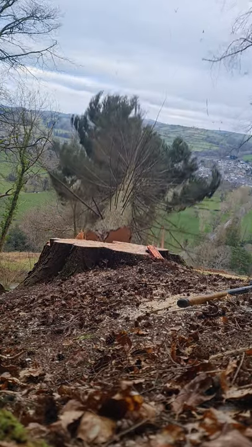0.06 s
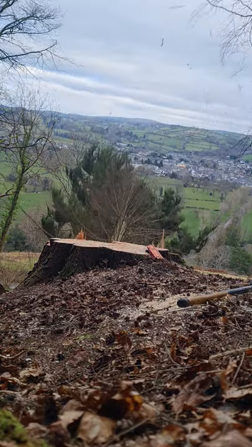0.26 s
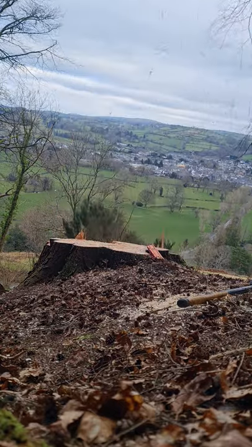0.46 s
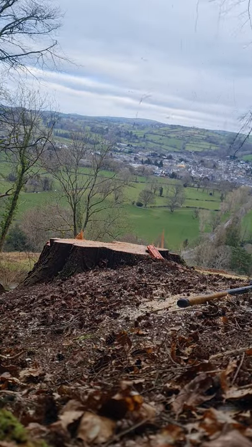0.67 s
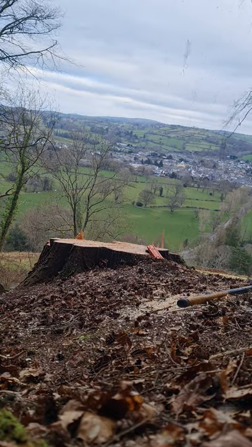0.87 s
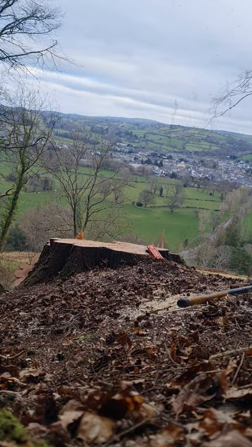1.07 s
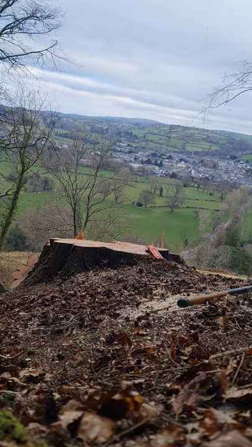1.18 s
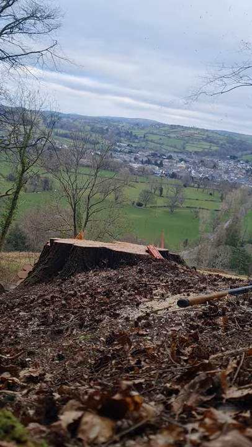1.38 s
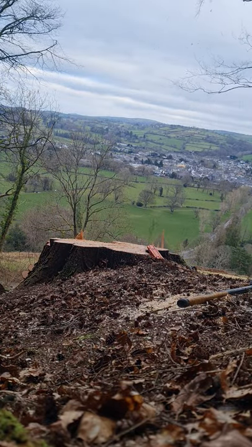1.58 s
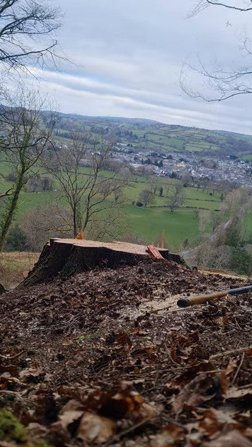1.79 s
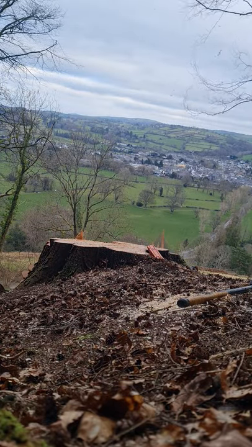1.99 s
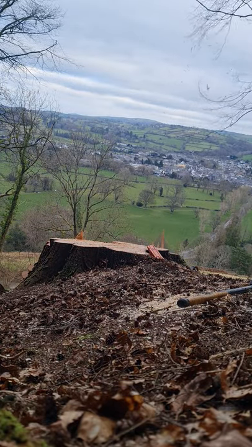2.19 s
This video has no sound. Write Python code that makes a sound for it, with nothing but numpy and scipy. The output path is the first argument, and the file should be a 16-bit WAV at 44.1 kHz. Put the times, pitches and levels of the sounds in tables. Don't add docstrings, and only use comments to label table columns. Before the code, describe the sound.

A large felled tree crashes through snapping branches and lands with a heavy, deep thud outdoors

```python
import sys
import numpy as np
from scipy import signal
from scipy.fft import rfft, irfft, next_fast_len
from scipy.io import wavfile
from scipy.ndimage import map_coordinates

SR = 44100
rng = np.random.default_rng(int(sys.argv[2]) if len(sys.argv) > 2 else 0)


def int16_out(signal):
    q = np.round(np.clip(np.atleast_2d(signal).T, -1, 1) * 32767)
    wavfile.write(sys.argv[1], SR, q.astype(np.int16))


def gain_from_db(level_db):
    decades = np.asarray(level_db, float) / 20
    return 10 ** decades


N = 99225

THUD_S = .7447


def unit(x):
    return x / np.sqrt(np.mean(x ** 2) + 1e-20)


def along(points, hz):
    f, v = np.transpose(points)
    return np.interp(np.log(hz + 1), np.log(f + 1), v)


def curves(rows):
    s, *cols = np.transpose(rows)
    return [np.interp(np.arange(N) / SR, s, c) for c in cols]


def wobble(rate):
    knots = rng.standard_normal(int(N * rate / SR) + 4)
    return map_coordinates(knots, [np.arange(N) * rate / SR])


def filtered(x, response):
    m = next_fast_len(N + 8192)
    return irfft(rfft(x, m) * response(np.fft.rfftfreq(m, 1 / SR)), m)[..., :N]


def coloured(noise, spectrum):
    return unit(filtered(noise, lambda hz: gain_from_db(along(spectrum, hz))))


def spread(pair):
    # frequency in Hz, left-right likeness from 0 to 1.
    likeness = [(60, 0.9), (180, 1), (550, 0.88), (1650, 0.028), (4970, 0.17), (15000, 0.72)]

    def mid_side_gains(hz):
        angle = np.arccos(np.clip(along(likeness, hz), -1, 1)) / 2
        return np.array([np.cos(angle), np.sin(angle)])
    mid, side = filtered(pair, mid_side_gains)
    return np.array([mid + side, mid - side])


def valley():
    # frequency in Hz, level of the distant hush in dB per Hz.
    hush_spectrum = [(20, -26), (40, -3), (65, 4.5), (150, -6), (300, -11.5), (1300, -15.5), (4500, -21.5),
                     (15000, -27)]
    whine_hz, whine_db, on_s, off_s = 1240, -65.5, 1.58, 2.09
    t = np.arange(N) / SR
    hush = coloured(rng.standard_normal((2, N)), hush_spectrum) * gain_from_db(-54 + .5 * wobble(5.77))
    gate = np.clip(np.minimum(t - on_s, off_s - t) / 0.021, 0, 1)
    whine_level = np.sqrt(2) * gain_from_db(whine_db + .6 * wobble(29.0))
    whine = whine_level * gate * np.sin(2 * np.pi * whine_hz * t)
    return spread(hush) + whine


def snaps():
    # start in seconds, peak in dB, pitch in Hz.
    far_twigs = [(.0125, -20.5, 4200), (.0925, -32.5, 4100), (.1785, -27, 3210), (.191, -19.5, 4170),
                 (.1967, -20, 2950), (.227, -9, 3400), (.253, -11, 4050), (.286, -16, 3470),
                 (.2945, -21, 2200), (.3015, -17, 3010), (.377, -27, 1820), (.39, -18.5, 1850),
                 (.426, -20.5, 1780), (.469, -22, 1810), (.479, -16.5, 3500), (.49, -16, 3500),
                 (.4937, -24.5, 1840), (.535, -16, 3460), (.557, -18, 2150), (.5755, -13.5, 3070),
                 (.594, -21, 1800), (.624, -17, 2800), (.6643, -12, 3630), (.6754, -12, 3000),
                 (.689, -11, 3200), (.704, -14, 3200), (.7283, -14.5, 2440), (.7846, -20, 1680),
                 (.797, -15, 900), (.803, -15.5, 1890), (.8045, -13.5, 760), (.8276, -16.5, 1290),
                 (.866, -15, 800), (.874, -15, 660), (.8959, -19, 1710), (.9075, -18, 1700),
                 (.9414, -16, 1480), (.9543, -20, 1700), (1.0285, -32, 3520), (1.0957, -29, 1710),
                 (1.1215, -29, 1700), (1.1435, -23, 3540), (1.1867, -19, 2970), (1.2095, -23, 2510),
                 (1.237, -28.5, 2800), (1.2848, -20, 2200), (1.3285, -24, 2900), (1.372, -26.5, 1310),
                 (1.3893, -29, 2000), (1.4313, -31, 1400), (1.4425, -29, 1870), (1.5077, -38, 1500)]
    # start in seconds, peak in dB, pitch in Hz.
    near_twigs = [(.0128, -19, 12500), (.0128, -24, 7500), (.026, -28, 700), (.0343, -18, 13000),
                  (.036, -23, 7500), (.0882, -20, 13000), (.2276, -18, 2200), (.2273, -17, 5500),
                  (.2275, -20, 12500), (.2532, -11, 4300), (.5752, -9, 1700), (.5761, -11, 4300),
                  (.7287, -11, 4800), (.7293, -23, 9000), (1.0218, -30, 8000), (1.143, -32, 6500),
                  (1.187, -29, 7500), (1.2088, -30, 7500), (1.2851, -25, 3800), (1.3153, -14, 7000),
                  (1.3153, -9.5, 13500), (1.3168, -19, 12000), (1.317, -24, 3700), (1.3187, -26, 3700),
                  (1.3186, -14, 12500), (1.491, -28, 3600), (1.4916, -39, 7500), (1.9137, -36, 1250),
                  (1.9133, -37, 4000), (2.189, -45, 1400), (2.195, -43, 1400)]
    ring_cycles, splinter_cycles = 2.8, 35
    splinter_db, late_s = -8, .0007
    shower_db, shower_t60_s = -28.5, 0.16
    out, t = np.zeros((2, N + 4096)), np.arange(2048) / SR
    for k, (s, db, hz) in enumerate([*far_twigs, *near_twigs]):
        rise = 1 - np.exp(-t * hz)
        phase = np.pi * rng.random() * min(hz / 2000, 1) * np.array([[0], [1]])
        ring = rise * np.sin(2 * np.pi * hz * t + phase) * gain_from_db(-20 * t * hz / ring_cycles)
        band = signal.butter(2, [hz / 1.405, min(hz * 1.44, SR / 2 - 999)], "band", fs=SR)
        splinters = unit(signal.lfilter(*band, rng.standard_normal((2, len(t)))))
        burst = gain_from_db(splinter_db - 60 * t * hz / splinter_cycles)
        shower = (k < len(far_twigs)) * gain_from_db(shower_db - 60 * t / shower_t60_s)
        at = round((s + late_s) * SR)
        out[:, at:at + len(t)] += gain_from_db(db + 2.5) * (ring + rise * splinters * (burst + shower))
    return out[:, :N]


def ground():
    # time in seconds, shaking of the ground in dB.
    shaking = [(0, -46), (.044, -41), (.15, -42.5), (.244, -29), (.298, -32), (.432, -26), (.57, -31),
               (.7, -25), (.77, -16.5), (.86, -17.5), (.94, -27), (1.212, -44.5), (1.386, -43.5),
               (1.568, -63), (1.6, -56)]
    # frequency in Hz, level of the rumble in dB per Hz.
    rumble_spectrum = [(12, -39), (20, -17), (60, -1.5), (108, -3.5), (192, -15.5), (245, -9.5),
                       (500, -22.5), (650, -69), (1100, -120)]
    shake_db, = curves(shaking)
    fade = np.clip((1.7 - np.arange(N) / SR) / 0.15, 0, 1)
    rumble = coloured(rng.standard_normal((2, N)), rumble_spectrum)
    return gain_from_db(shake_db - 2.5 + 3.0 * wobble(14.26)) * fade * rumble


def crackle(spectrum, grain_db, spread_db, life_s, count):
    when, luck = rng.random((count, 2)).T
    sizes = gain_from_db(-spread_db * np.log(1 - .98 * luck))
    breaks = np.bincount((when * N).astype(int), sizes, N)
    spiky = unit(signal.lfilter([1], [1, -np.exp(-1 / (life_s * SR))], breaks))
    noise = rng.standard_normal((2, N)) * (1 + gain_from_db(grain_db) * spiky)
    return coloured(noise, spectrum)


def branches():
    # time in seconds, force of the breaking in dB, share hidden by the slope from 0 to 1.
    crash = [(0, -42, 0.09), (.04, -39, 0), (.16, -43, 0.18), (.221, -37.5, 0.18), (.228, -32.5, 0.05),
             (.36, -35.5, 0.24), (.62, -34, 0.3), (.735, -30.5, 0.49), (.76, -31, 0.78), (.89, -30.5, 0.94),
             (.99, -35.5, 0.88), (1.12, -44.5, 0.91), (1.2, -45, 0.28), (1.3, -45, 0.6), (1.4, -48, 0.87),
             (1.52, -54.5, 0.72), (1.66, -61.5, 0.63), (2.25, -66, 1)]
    # frequency in Hz, level in dB per Hz.
    open_spectrum = [(120, -42), (250, -12), (500, -1.5), (900, -8), (2000, -9), (3500, -4), (6000, -10.5),
                     (15000, -14)]
    # frequency in Hz, level in dB per Hz.
    hidden_spectrum = [(120, -32), (250, -2.5), (500, -2), (900, -1.5), (2400, -1.5), (4000, -8.5),
                       (7000, -21), (15000, -51)]
    force_db, hidden = curves(crash)
    hidden = np.clip(hidden, 0, 1)
    seen = crackle(open_spectrum, grain_db=-13.0, spread_db=-4.0, life_s=0.0037, count=500)
    seen = seen * gain_from_db(0.69 * wobble(23.95))
    behind = crackle(hidden_spectrum, grain_db=-11.5, spread_db=8.5, life_s=0.0057, count=500)
    behind = behind * gain_from_db(0.67 * wobble(18) + 1.0)
    clumping = np.clip((np.arange(N) / SR - 1.15) * 10, 0, 1)
    force_db = force_db + 1.2 * clumping * (wobble(29.84) - .5)
    return gain_from_db(force_db + 5.5) * (np.sqrt(1 - hidden) * seen + np.sqrt(hidden) * behind)


def wood(x):
    t = np.arange(SR // 4) / SR
    decay = gain_from_db(-60 * t / .13)
    tail = rng.standard_normal((2, len(t))) * decay * (1 - np.exp(-t / 0.0044))
    tail = tail / np.linalg.norm(tail[0])
    return spread(signal.fftconvolve(x[None], tail, axes=1)[:, :N])


def push(s, db, hz, cycles):
    u = (np.arange(N) / SR - s) * hz
    return gain_from_db(db) * np.cos(2 * np.pi * u) * np.exp(-(u / cycles) ** 2)


def trunk():
    # time in seconds, peak in dB, pitch in Hz, signed strength.
    ground_bumps = [(0.049, -25.5, 302, 0.86), (.225, -18, 250, -0.81), (0.238, -22.5, 120, 1),
                    (0.2528, -22.5, 100, 0.92), (.259, -20.5, 89, 0.92), (0.267, -24, 60, -0.92),
                    (0.3304, -14.5, 283, -0.94), (.335, -21, 260, -1), (0.344, -16, 128, 0.67),
                    (.411, -14, 109, 1), (0.4185, -15, 151, -0.95), (0.4266, -7, 210, 0.66),
                    (0.4395, -20, 67, -1.1), (0.4493, -23, 70, 1), (.497, -24, 114, -0.78),
                    (0.6704, -18, 200, -1.03), (.68, -19.5, 70, 0.93), (0.7, -23, 160, 1),
                    (0.7094, -24, 121, -1.5), (0.7258, -15.5, 80.4, 0.57), (0.762, -9, 120, 1),
                    (0.7726, -11.5, 170, 0.91), (0.7797, -18, 200, 1), (0.7913, -6, 109, 0.97),
                    (.802, -11, 350, 1), (0.8057, -10.5, 332, -1), (0.8218, -22, 200, -0.75),
                    (0.8262, -12.5, 250, -1), (0.8307, -16, 109, 1), (0.8364, -16.5, 90, -1),
                    (0.8431, -17.5, 109, 0.93), (0.8487, -15.5, 130, -0.92), (0.8675, -28, 70, -1.9),
                    (0.877, -20, 60, 1), (0.8882, -11, 70, -1.1), (0.907, -21, 90, -0.77),
                    (0.9127, -17, 108, 0.86), (1.141, -37.5, 62, 1), (1.223, -36.5, 91.5, -0.95),
                    (1.246, -30.5, 328, 0.92), (1.26, -32, 298, -1.4), (1.278, -29, 232, -1.05),
                    (1.286, -31.5, 120, -1.2), (1.293, -34, 136, 1), (1.369, -43, 65, 1),
                    (2.191, -41.5, 260, -1.1), (2.2, -46, 240, 1)]
    thud_db, thud_hz = 6.5, 306
    lap_s, lap_loss_db, lap_ease, lap_sag = .0129, 6, .72, .99
    edge_db, edge_hz, edge_loss_db = -11, 650, 3
    bumps = sum(sign * push(s, db, hz, cycles=0.44) for s, db, hz, sign in ground_bumps)
    laps = np.zeros(N)
    for k, sway in enumerate(rng.standard_normal(6)):
        s = THUD_S + k * lap_s
        db = thud_db - lap_loss_db * k ** lap_ease
        edge_s = s + 0.00035 * k * sway
        laps -= push(s, db, thud_hz * lap_sag ** k, cycles=0.64)
        laps -= push(edge_s, db + edge_db - edge_loss_db * np.sqrt(k), edge_hz, cycles=0.51)
    boom = push(THUD_S + 4 * lap_s, -15, 1 / lap_s, cycles=1.6)
    return bumps + laps - boom


def scene():
    blows = trunk()
    crown_and_slope = spread(branches() + ground())
    return valley() + snaps() + crown_and_slope + blows + gain_from_db(-13) * wood(blows)


def ducking():
    depth_db, lead_s, recover_s = -11.5, .0086, .049
    since = np.arange(N) / SR - THUD_S + lead_s
    return gain_from_db(depth_db * np.clip(since / 0.0041, 0, 1) * np.exp(-np.abs(since) / recover_s))


def low_pass(x):
    return signal.sosfilt(signal.butter(12, 16810, fs=SR, output="sos"), x)


def record(dry):
    # frequency in Hz, left port over right in dB.
    port_difference = [(60, -1.5), (130, -1), (290, -1), (640, -2.5), (1410, 0), (3100, 5), (6820, 14),
                       (15000, 27)]
    # frequency in Hz, microphone response in dB.
    mic_response = [(15, -22), (40, 2.5), (6000, 0), (7600, 3.5), (8600, -4), (10000, -3.5), (13500, 2.5),
                    (15500, -5)]
    lag_s, top_hz = -0.000068, 15950

    def ports(hz):
        right = gain_from_db(-along(port_difference, hz))
        lag = np.exp(-1j * np.pi * hz * lag_s)
        even_power = np.sqrt(2 / (1 + right ** 2))
        return gain_from_db(along(mic_response, hz)) * (hz < top_hz) * even_power * np.array([lag, right / lag])
    mix = filtered(dry * ducking(), ports)
    return low_pass(mix)


dry = scene()
out = record(dry)
int16_out(out)
```